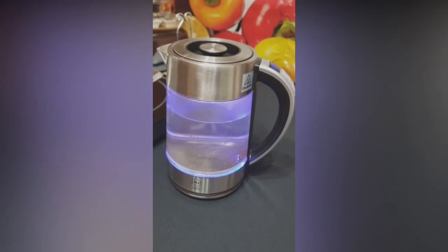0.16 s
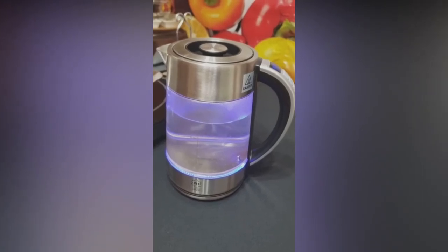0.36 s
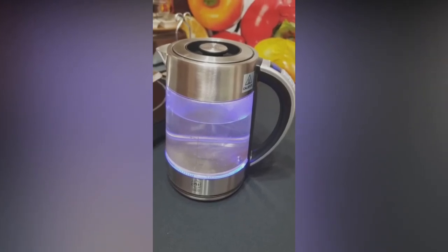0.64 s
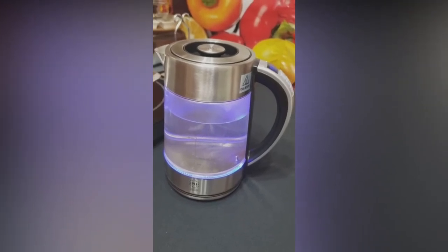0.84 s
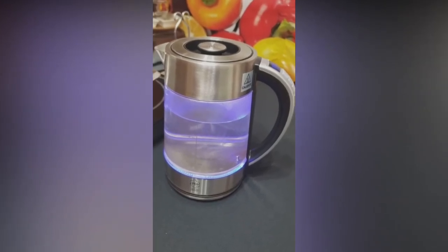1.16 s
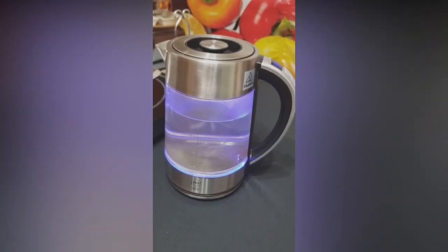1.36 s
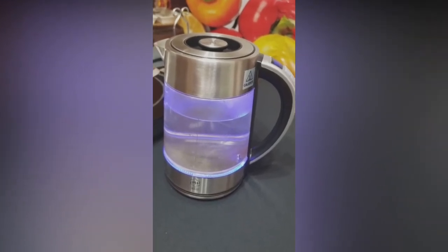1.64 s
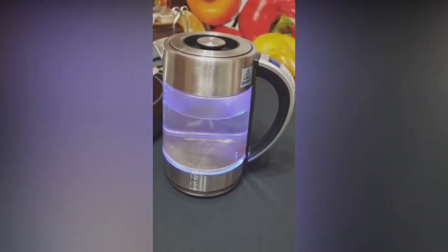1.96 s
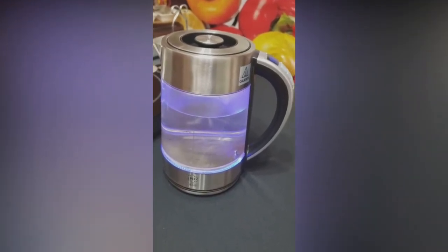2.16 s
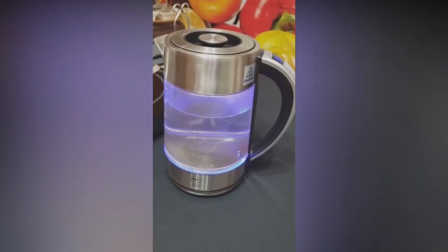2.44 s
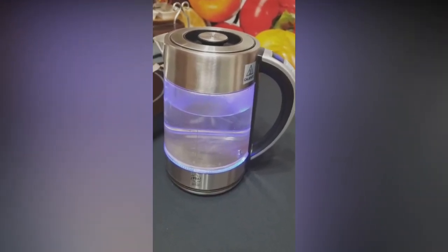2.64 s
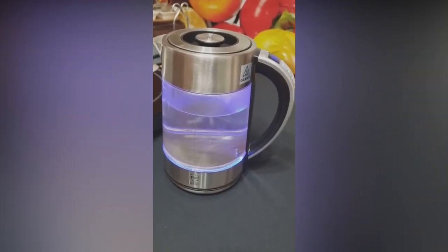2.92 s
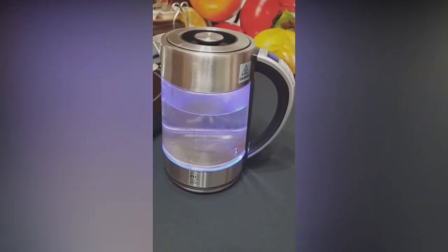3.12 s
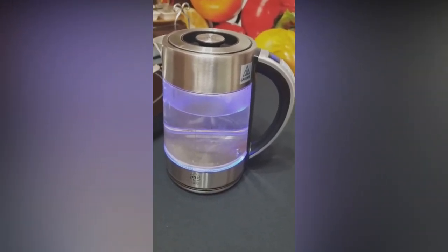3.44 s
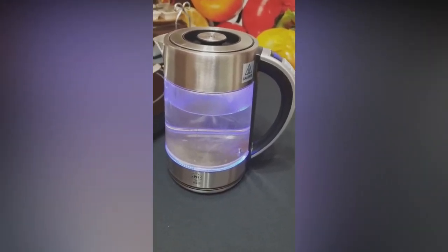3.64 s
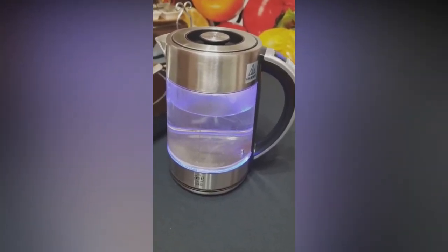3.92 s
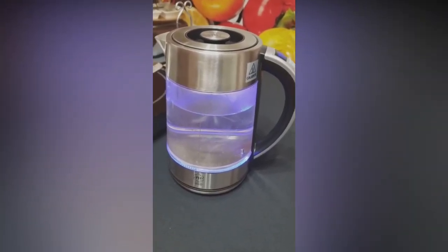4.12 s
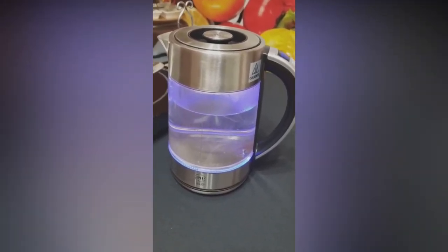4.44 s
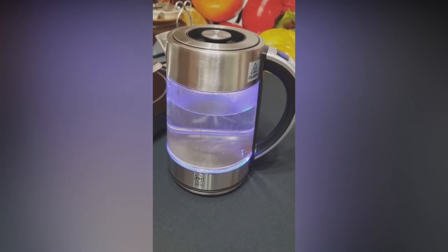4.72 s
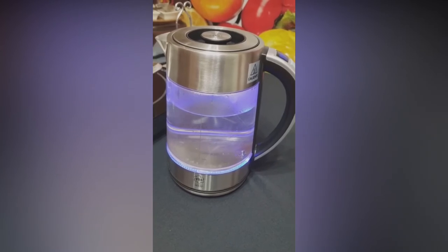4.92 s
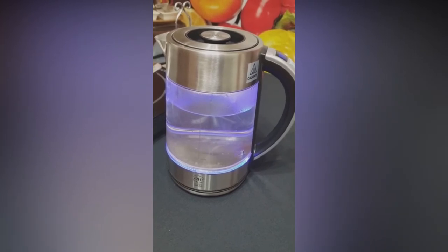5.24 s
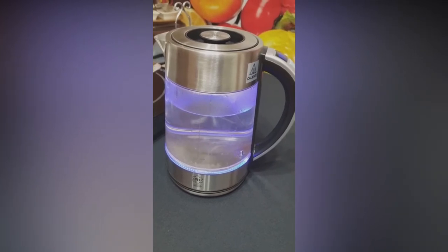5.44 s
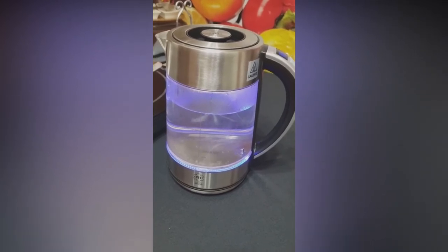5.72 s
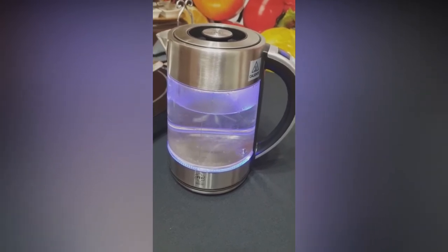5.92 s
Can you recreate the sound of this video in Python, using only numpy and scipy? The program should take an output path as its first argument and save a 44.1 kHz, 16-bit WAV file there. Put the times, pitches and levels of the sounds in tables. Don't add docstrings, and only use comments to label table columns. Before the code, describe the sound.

From 0 seconds a kettle is already heating water close to the microphones, indoors on a counter. Countless minute steam bubbles collapse so densely that they merge into a continuous, slightly grainy rush. It is coloured by the hot plate, glass wall and metal lid: a hollow midrange roar, strongest around 700 to 1600 hertz, with thinner glassy and metallic hiss above. A delicate crackling fizz covers the very top, wide in stereo and flickering in small patches. Over roughly the first 3 seconds the upper ring eases slightly from its brighter start. Through to about 6 seconds the fizz steadily fades by a few decibels, while the resonant emphasis shifts subtly without a sweeping pitch. Overall loudness stays nearly even, with only slight restless flutter. Smooth room wash and a faint low hum remain behind; it ends still heating, with no click, whistle or large gurgle.

```python
import sys
import numpy as np
from scipy import signal
from scipy.fft import rfft, irfft, next_fast_len
from scipy.io import wavfile
from scipy.ndimage import uniform_filter1d

SR = 44100
rng = np.random.default_rng(int(sys.argv[2]) if len(sys.argv) > 2 else 0)


def generate_wav(signal):
    frames = np.transpose(np.atleast_2d(signal))
    scaled = np.clip(frames, -1, 1) * 32767
    pcm = np.round(scaled).astype(np.int16)
    wavfile.write(sys.argv[1], SR, pcm)


def makeup_ratio(level_db):
    decades = np.asarray(level_db, float) / 20
    return 10 ** decades


N = 268083
SIZE = next_fast_len(N)
HZ = np.fft.rfftfreq(SIZE, 1 / SR)


def colour(table):
    hz, db = np.transpose(table)
    return makeup_ratio(np.interp(np.log(HZ + 1), np.log(hz), db))


def walk(rate):
    hold = int(SR / rate)
    levels = np.repeat(rng.standard_normal(N // hold + 1), hold)
    slewed = uniform_filter1d(uniform_filter1d(levels, hold), hold)
    return 0.85 * slewed[:N]


def pops(rate, size_db):
    when, sign = rng.random((2, N))
    size = makeup_ratio(size_db * np.clip(rng.standard_normal(N), -3, 2.5))
    clicks = (when < rate / SR) * np.sign(sign - 0.5) * size
    return clicks / np.std(clicks)


def kettle(upper_db):
    # frequency in Hz, width in Hz, peak in dB, left minus
    # right in dB, left lead in rad.
    kettle_modes = [(312.4, 64.7, -10.5, 0, 0.02), (371, 53, -17, 3, 0.23), (462, 45, -15.5, -0.5, 0.12),
                    (575, 280, -21, -1.5, 0.052), (716.7, 53, -3.5, 0.3, -0.058), (881, 52, -1.5, 0.5, 0.026),
                    (1025.7, 35, -0.5, 1.4, 0.), (1143, 124, 0.5, -0.5, -0.07), (1291, 112, -1.5, -1, 0.086),
                    (1416, 121, 2., -1, 0.66), (1578, 105, -3, 2, 0.44),
                    (1773, 86, -7.5, 4, .5), (1935, 126, -12.5, 1., 0.86), (2192, 104, -6.5, 4.5, -0.3),
             (2400, 98, -9.5, 0, -0.0067), (2495, 82, -5, 0.5, 0.17), (2623, 82, -6.5, -2.5, -0.024),
             (2784, 99, -7, 6, 0.26), (2946, 100, -10, 9.5, 0.84), (3160, 93, -14, 0, -0.41),
             (3365, 77, -16, 13, -0.89), (3590, 150, -19, 12.5, -1.2),
                    (3836, 95, -11, -5, -0.2), (4076, 130, -15, 4, -.2), (4267, 187, -15, 3.5, -0.06),
           (4576, 190, -15, 10, 0.014), (4850, 133, -21, 2, -1.), (5467, 385, -20, -6, -0.17),
           (6960, 340, -21.5, 0, -.1), (7340, 440, -24.5, 6, -0.096)]
    # frequency in Hz, change from start to end in dB.
    warming = [(300, 1.1), (1130, -1.2), (1300, 0), (1450, 4.5), (1800, -4), (2500, 0), (7400, -2.5)]
    # low end in Hz, high end in Hz.
    upper_low, upper_high = (1510, 2500)
    collapses_per_s, size_db, flicker_db = 4000, 3, 0.6

    out = 0
    surge = walk(5.13)
    for hz, width, db, pan_db, lead in kettle_modes:
        upper_share = np.clip((hz - upper_low) / (upper_high - upper_low), 0, 1)
        warm_db = np.interp(hz, *np.transpose(warming)) * np.linspace(-0.5, 0.5, N)
        clicks = pops(collapses_per_s, size_db)
        level_db = warm_db + upper_share * upper_db + 0.15 * surge + flicker_db * walk(13)
        ring = makeup_ratio(db) / (1 + 1j * (HZ ** 2 - hz ** 2) / (1.55 * width * (HZ + 1))) ** 2
        left = makeup_ratio(pan_db / 2) * np.exp(0.5j * lead)
        out = out + rfft(clicks * makeup_ratio(level_db), SIZE) * ring * np.array([[left], [1 / left]])
    return out


def nodes():
    # frequency in Hz, width in Hz, depth from 0 to 1.
    dips = [(793, 81, 0.25), (958, 32, 0.62), (1673, 40, 0.58), (2020, 89, 0.32), (2316, 80, 0.4),
            (3010, 49, 0.52), (3670, 61, 0.15), (3880, 43, 0.56), (4510, 84, 0.9), (1272, 31, 0.22),
            (1836, 41, 0.36), (3110, 40, 0.3), (4090, 46, 0.6)]
    gain = 1
    for hz, width, depth in dips:
        gain = gain * (1 - depth / (1 + (2 * (HZ - hz) / width) ** 2))
    return gain


def fizz(fizz_db):
    # frequency in Hz, level in dB.
    fizz_colour = [(7500, 1.5), (9600, 1), (11000, 2.5), (12000, -0.5), (13300, 1), (14000, -1.5),
                   (14900, 3.5), (16000, -5.5)]
    pops_per_s, size_db, split_hz = 14000, 2, 11200
    mean_db = fizz_db.mean()
    coarse = 1 / (1 + (HZ / split_hz) ** 8)

    out = 0
    for share, fade, like in ((coarse, 1.56, 0.35), (1 - coarse, 0.8, 0.073)):
        both, left, right = (pops(pops_per_s, size_db) for _ in range(3))
        crackle = np.sqrt(like) * both + np.sqrt(1 - like) * np.array([left, right])
        patchy_db = fade * (fizz_db - mean_db) + 1.4 * walk(18) + 0.66 * walk(4.9)
        out = out + rfft(crackle * makeup_ratio(patchy_db), SIZE) * np.sqrt(share)
    low_cut = 1 / (1 + (7000 / (HZ + 1)) ** 12)
    top = irfft(out * colour(fizz_colour) * low_cut, SIZE)[:, :N]
    return top / np.std(top) * makeup_ratio(mean_db)


def room(upper_db):
    # frequency in Hz, level in dB per Hz.
    wash_colour = [(30, -36), (120, -42.5), (330, -31.5), (950, -35), (1250, -13), (1900, -19),
                   (4600, -23.5), (6200, -23)]
    # frequency in Hz, level in dB per Hz.
    hum_colour = [(20, -40), (60, -43), (130, -33), (210, -33), (260, -48), (400, -58)]
    wash = rfft(rng.standard_normal((2, N)) * makeup_ratio(1.3 * upper_db), SIZE)
    wash = wash * colour(wash_colour) / (1 + (HZ / 7500) ** 8)
    hum = rfft(rng.standard_normal(N) * makeup_ratio(1.7 * walk(3.04)), SIZE)
    return wash + hum * colour(hum_colour)


def scene():
    boil_db, fizz_db, fizz_fade_db_per_s = -30.5, -21, 0.87
    upper_drop_db, upper_settle_s = 1, 2.7
    t = np.arange(N) / SR
    upper_db = upper_drop_db * np.exp(-t / upper_settle_s)
    upper_db = upper_db - upper_db.mean()

    boil = irfft(kettle(upper_db) * nodes() + room(upper_db), SIZE)[:, :N]
    fading_fizz = fizz(fizz_db - fizz_fade_db_per_s * (t - t.mean()))
    return makeup_ratio(boil_db) * (boil / np.std(boil) + fading_fizz)


def top_cut(x):
    return signal.sosfilt(signal.butter(12, 15745, fs=SR, output="sos"), x)


def record(dry):
    return top_cut(dry)


dry = scene()
out = record(dry)
generate_wav(out)
```